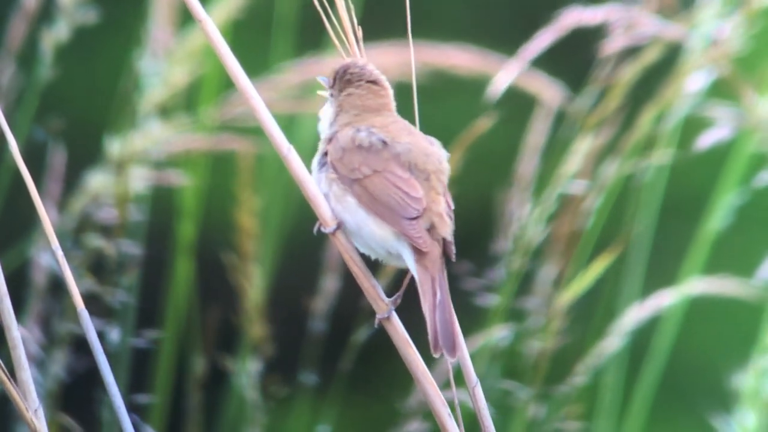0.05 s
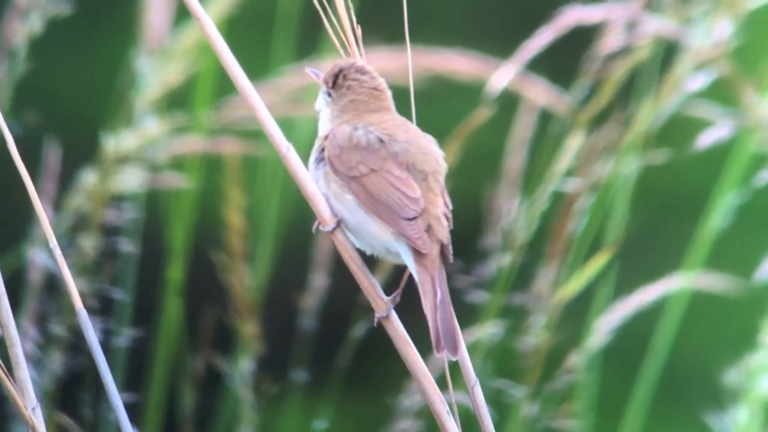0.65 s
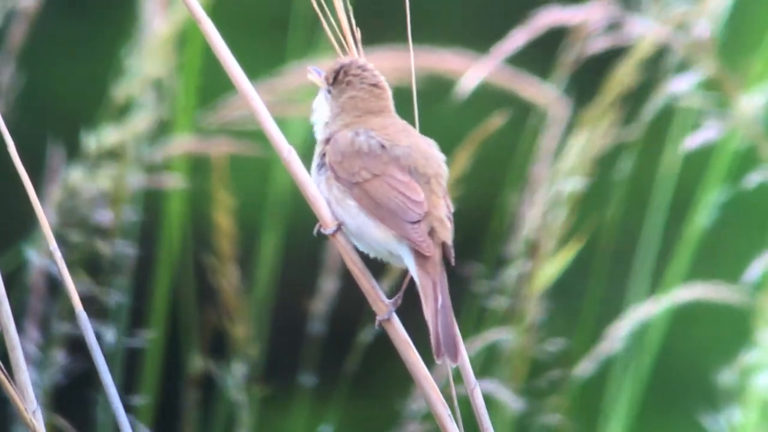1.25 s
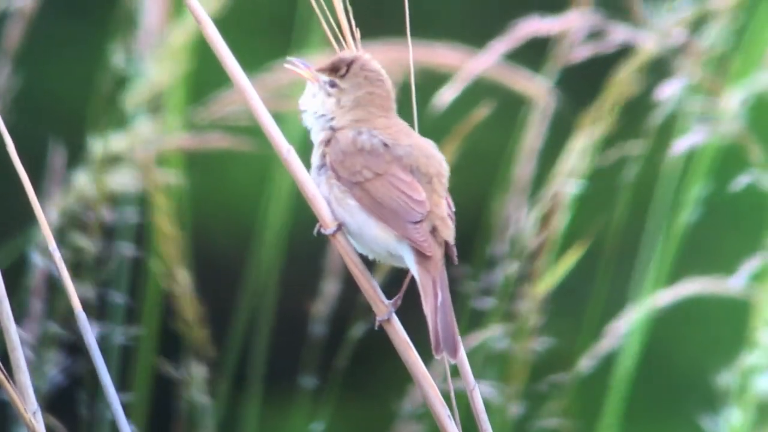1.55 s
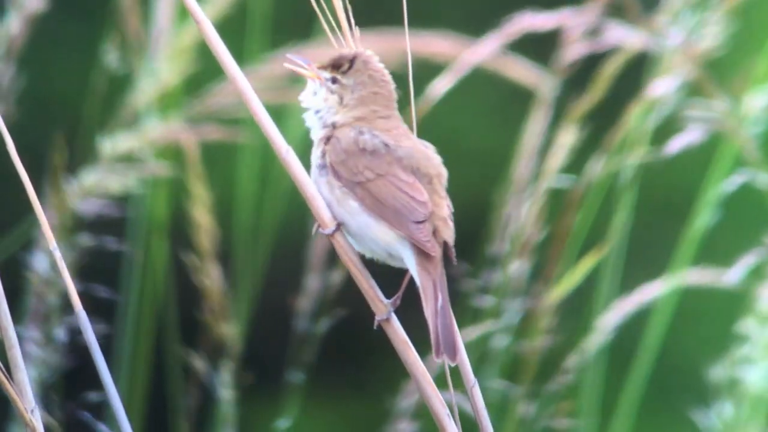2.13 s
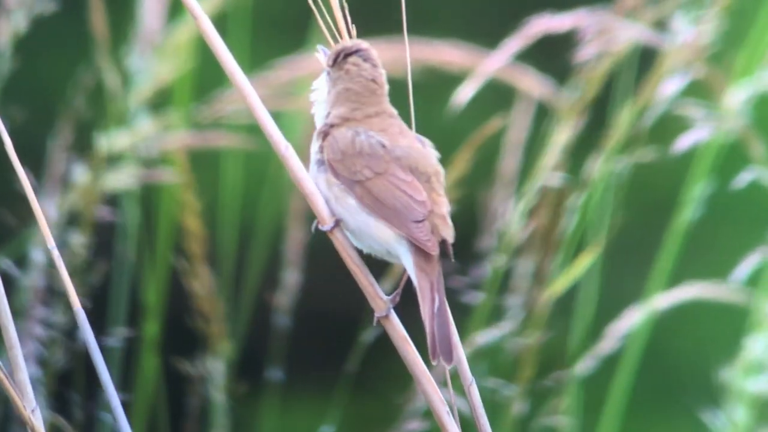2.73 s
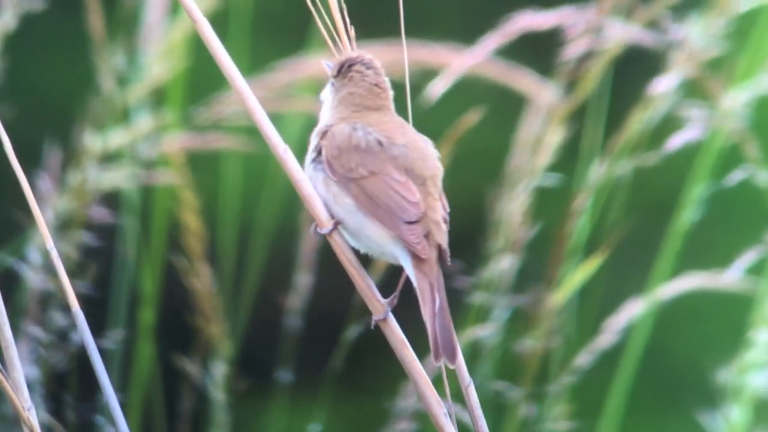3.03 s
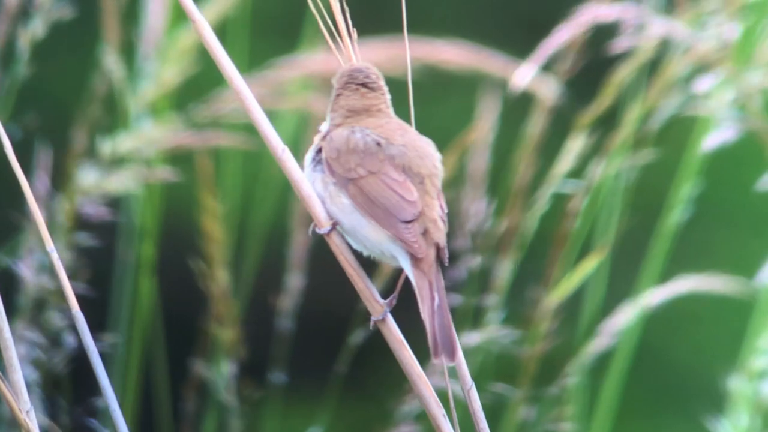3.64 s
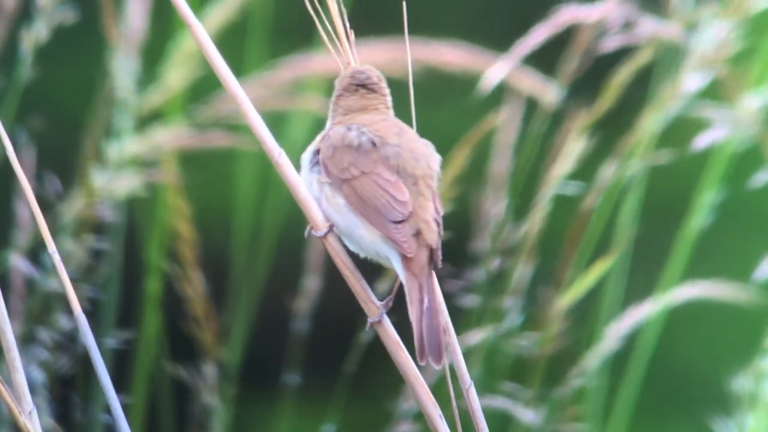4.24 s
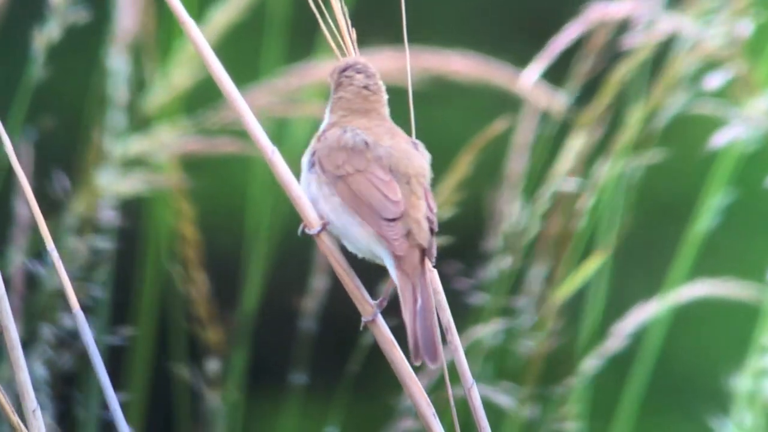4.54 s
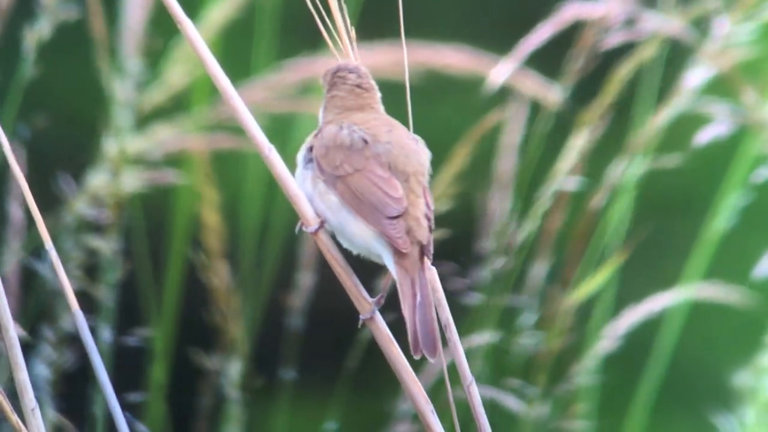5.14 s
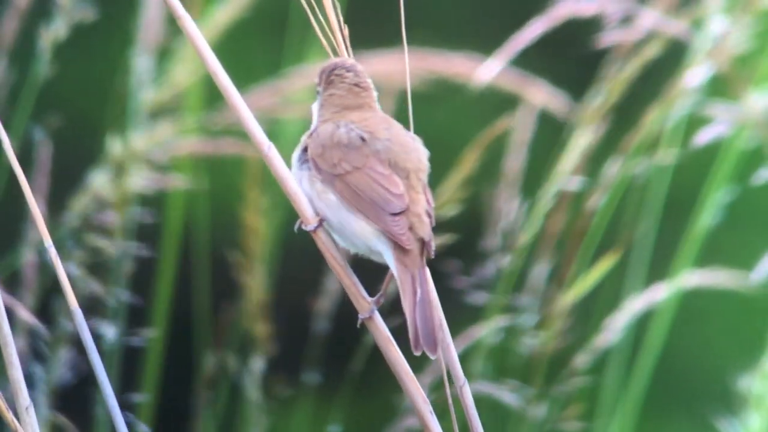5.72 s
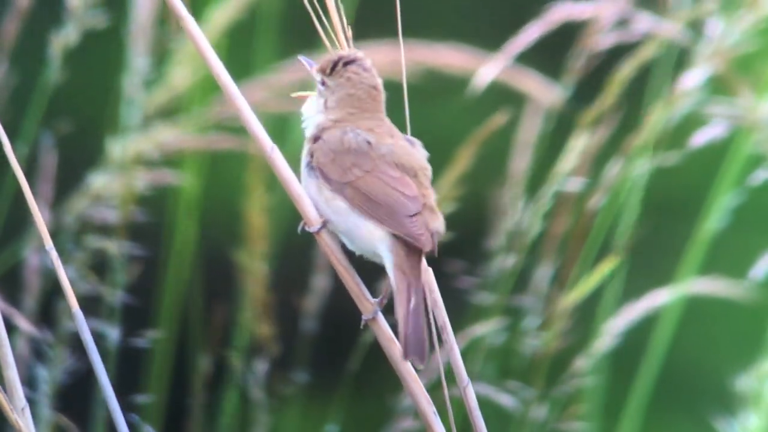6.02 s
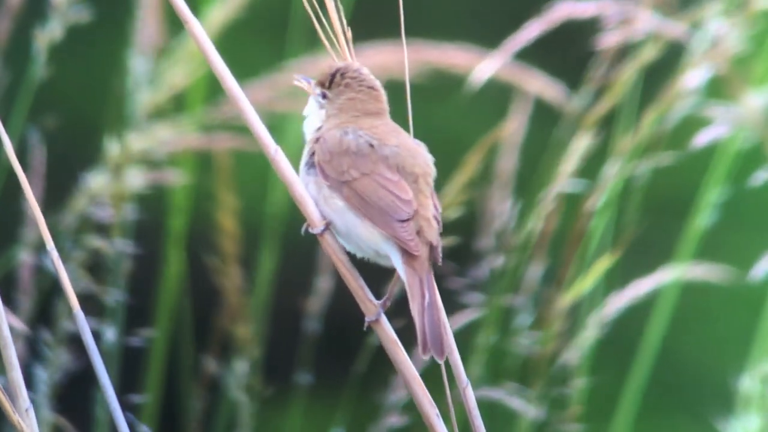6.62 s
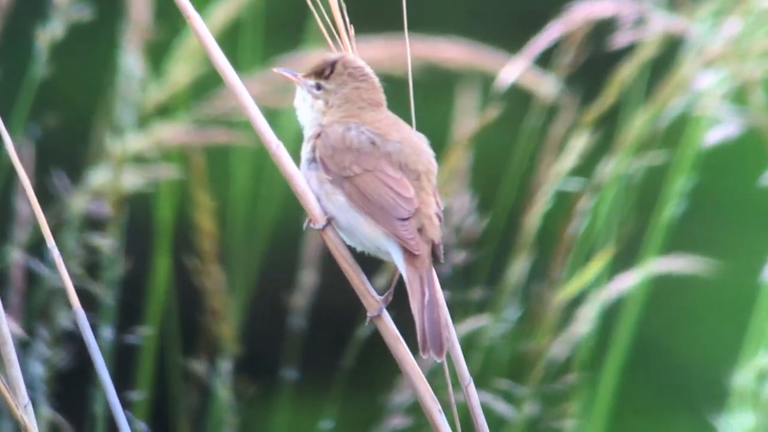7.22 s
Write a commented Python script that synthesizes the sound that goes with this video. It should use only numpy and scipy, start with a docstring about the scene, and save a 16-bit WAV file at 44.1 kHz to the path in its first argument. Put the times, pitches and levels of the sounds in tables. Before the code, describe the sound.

In a reed bed, a warbler sings runs of dry, harsh chacks, switching to quick squeaky chips and raspy sliding notes before returning to chacks. A second bird keeps repeating a clear held whistle that flicks sharply upward, the loudest sound. The notes echo briefly among the stems. Fainter birds call further off, over a steady low rush, soft hiss and distant engine hum.

```python
"""In a reed bed, a warbler sings dry chacks, quick pips and chips, two-voiced notes and raspy slurs.
A second bird repeats a held whistle that flicks upward; fainter birds call further off.
Each note is a tone on a moving pitch; shaking it fast makes it rough. The reeds scatter every note,
over a steady outdoor rush and the hum of a distant engine.
The camera's gain control turns the sound down after each loud note."""
import sys
import numpy as np
from scipy import signal
from scipy.fft import rfft, irfft, next_fast_len
from scipy.io import wavfile
from scipy.ndimage import uniform_filter1d, map_coordinates

SR = 44100
rng = np.random.default_rng(int(sys.argv[2]) if len(sys.argv) > 2 else 0)


def dump(signal):
    """Clip the signal to [-1, 1] and save it as 16-bit WAV at the path in sys.argv[1]."""
    limited = np.clip(np.atleast_2d(signal).T, -1, 1)
    pcm = np.round(limited * 32767).astype(np.int16)
    wavfile.write(sys.argv[1], SR, pcm)


N = 325017


def amp(db):
    """Turn decibels into a gain."""
    return 10 ** (np.asarray(db) / 20)


def along(points, hz):
    """Read between (frequency, value) points, on a log frequency axis."""
    f, v = np.transpose(points)
    return np.interp(np.log(hz + 1), np.log(f + 1), v)


def over_time(points):
    """Join (time, value) points with straight lines."""
    return np.interp(np.arange(N) / SR, *np.transpose(points))


def wobble(rate, size=N):
    """A smooth curve through `rate` random values a second."""
    knots = rng.standard_normal(int(size * rate / SR) + 4)
    return map_coordinates(knots, [np.arange(size) * rate / SR])


def filtered(x, response):
    """Give each frequency in x its own gain."""
    size = next_fast_len(N + SR // 2)
    return irfft(rfft(x, size) * response(np.fft.rfftfreq(size, 1 / SR)), size)[:N]


def noise(spectrum):
    """Noise with the given spectrum, scaled to an average power of 1."""
    x = filtered(rng.standard_normal(N), lambda hz: amp(along(spectrum, hz)))
    return x / np.sqrt(np.mean(x ** 2) + 1e-20)


def span(start, length):
    """A note's sample numbers (i) and its progress from 0 to 1 (u)."""
    i = np.arange(max(int(start * SR), 0), min(int((start + length) * SR), N))
    return i, np.clip((i / SR - start) / length, 0, 1)


def fade(u, rise, fall):
    """Fade in and out; rise and fall are shares of the note's length."""
    opening = np.sin(np.pi / 2 * np.clip(u / rise, 0, 1))
    closing = np.sin(np.pi / 2 * np.clip((1 - u) / fall, 0, 1))
    return opening * closing


def arc(u, first, middle, last):
    """A smooth bend through three pitches."""
    return np.polyval(np.polyfit([0, .5, 1], [first, middle, last], 2), u)


def tone(hz, partials_db=(0,)):
    """A moving pitch; its partials are sine waves at 1, 2, 3... times that pitch."""
    phase = 2 * np.pi * np.cumsum(hz) / SR
    return np.sqrt(2) * sum(amp(db) * np.sin((k + 1) * phase) for k, db in enumerate(partials_db))


# How long the reed bed echoes: f/Hz, time to fade by 60 dB/s
REED_DECAY = [(2000, 0.55), (4500, 0.52), (8000, 0.5)]

def reed_echoes(x, near_db, tail_db, near_decay_s=.12):
    """Nearby stems throw back a quick cloud of echoes; the wider reed bed adds a longer tail."""
    hz, t, spectrum = signal.stft(rng.standard_normal(SR // 2), SR, nperseg=256)
    decay = amp(-60 * t / along(REED_DECAY, hz)[:, None])
    tail = signal.istft(spectrum * decay, SR, nperseg=256)[1]
    t = np.arange(len(tail)) / SR
    stems = rng.standard_normal(len(t)) ** 3 * amp(-60 * t / near_decay_s) * (t > .003)
    response = amp(near_db) * stems / np.linalg.norm(stems) + amp(tail_db) * tail / np.linalg.norm(tail)
    echoes = signal.fftconvolve(x, response)[:N]
    # thin stems reflect high notes better than low ones
    return x + filtered(echoes, lambda hz: amp(along([(2700, -6), (4000, 0)], hz)))


# Tone colour of the open air: f/Hz, relative level/dB
AIR_SPECTRUM = [(20, -30), (32, -11), (50, 1), (68, 2.5), (95, -5.5), (160, -3.5), (250, -9.5), (340, -12),
                (600, -14.5), (1100, -17), (1500, -20), (2200, -53), (3300, -120)]

def outdoor_rush(level_db=-39):
    """A low, nearly steady rush of noise."""
    return amp(level_db + .28 * wobble(7.9)) * noise(AIR_SPECTRUM)


# Tone colour of the reeds: f/Hz, relative level/dB
HISS_SPECTRUM = [(600, -23), (1400, 5), (2600, 0.5), (4500, -2.5), (6000, -8.5), (8000, -13),
                 (12000, -18.5), (15500, -25)]

def reed_hiss(level_db=-46.5):
    """The reeds give a soft, even hiss."""
    return amp(level_db + .4 * wobble(1.64)) * noise(HISS_SPECTRUM)


# The tones in the engine's hum: f/Hz, level/dB
ENGINE_TONES = [(64.3, -44), (75.3, -57), (129.5, -51.5), (150.6, -53), (188.3, -55), (226, -62.5),
                (263.5, -57.5), (338.5, -63.5), (376.5, -60.5), (414, -57.5), (452, -57.5), (465.5, -58)]
# How hard the engine works: t/s, added level/dB
ENGINE_EFFORT = [(0, -0.5), (1.4, -0.5), (3.1, -1), (3.7, -1), (5.5, 2.5), (6.3, -1.5), (7.37, 0.5)]

def engine_hum():
    """A distant engine hums on wavering low tones, louder when it works harder."""
    tones = sum(amp(db + 1.8 * wobble(2.07)) * tone(hz + .586 * wobble(2.984))
                for hz, db in ENGINE_TONES)
    return amp(over_time(ENGINE_EFFORT)) * tones


# Tone colour of the far chorus: f/Hz, relative level/dB
CHORUS_SPECTRUM = [(1000, -50), (1500, -11), (1850, 1.5), (2120, -2), (2450, -18), (3000, -29.5)]
# Its rise and fall: t/s, relative level/dB
CHORUS_LEVELS = [(0.0, -45.5), (1.37, -45), (2.52, -48), (3.86, -43.5), (4.25, -47.5), (5.67, -46.5),
                 (6.28, -45.5), (7.37, -49)]

def far_chorus(gain_db=1.5):
    """Far-off birds blur into one flickering band of noise."""
    return amp(gain_db + over_time(CHORUS_LEVELS) + 2.26 * wobble(14)) * noise(CHORUS_SPECTRUM)


# Distant calls: t/s, length/s, start f/Hz, end f/Hz, level/dB
FAR_CALLS = [(.526, .12, 1915, 2080, -39), (.78, 0.07, 1940, 1850, -40), (6.042, .19, 1975, 1890, -39.5),
             (6.257, 0.063, 1900, 3200, -42.5), (6.411, 0.073, 1906, 2450, -45),
             (6.612, 0.073, 1900, 3350, -43.5), (6.755, 0.1, 2740, 3050, -47),
             (6.84, 0.082, 3030, 2790, -47), (6.741, 0.315, 4330, 4277, -43.5),
             (6.999, 0.244, 4210, 4160, -45.5), (7.186, 0.18, 7170, 7170, -55),
             (7.28, 0.098, 4100, 3680, -52)]

def far_birds(waver_hz=45):
    """Thin, wavering glides carry across the marsh."""
    out, waver, flutter = np.zeros(N), wobble(300), wobble(60)
    for start, length, first, last, db in FAR_CALLS:
        i, u = span(start, length)
        hz = first + (last - first) * u + waver_hz * waver[i]
        out[i] += amp(db + 2 * flutter[i]) * fade(u, .34, .13) * tone(hz)
    return out


def far_twitter(start_s=5.212, period_s=.1283, pairs=8, note_s=.035):
    """A distant bird repeats a pair of quick falling notes at an even pace."""
    out, waver, flutter = np.zeros(N), wobble(300), wobble(160)
    for k in range(pairs):
        for delay_s, db in ((0, -42.5), (.034, -43.5)):
            i, u = span(start_s + k * period_s + delay_s, note_s)
            hz = arc(u, 4926, 3900, 2900) * (1 + .0427 * waver[i])
            out[i] += amp(db + 4 * flutter[i]) * fade(u, .14, .19) * tone(hz)
    return out


# Whistles: end t/s, full voice before the end/s, swell before the end/s, held f/Hz, drift/Hz,
# then level/dB of the held note, the swell, the lead-in, the flick and the tip
WHISTLE_CALLS = [(.322, 0.139, 0.15, 2700, 0, -24, -28.5, -47, -17, -36),
                 (1.849, 0.188, 0.17, 2593, 42, -26, -25.5, -39, -15.5, -35.5),
                 (2.386, 0.2, 0.19, 2574, 108, -35.5, -28, -44, -20, -46),
                 (2.941, 0.21, 0.078, 2835, -62, -31.5, -26, -45, -17, -50),
                 (4.6, 0.19, 0.13, 2625, -30, -30.5, -26, -35, -18, -50),
                 (5.067, 0.1, 0.15, 2738, -2, -20.5, -27, -34.5, -17, -40),
                 (5.583, 0.18, .11, 2699, 0, -28, -28.5, -43, -17, -40),
                 (6.11, 0.15, 0.092, 2608, 26.5, -21, -26.5, -40, -19, -41)]

def whistling_bird(call_s=.235, settle_s=.125, flick_s=.068, top_hz=4297, tip_hz=5200):
    """A whistle starts faintly, sinks onto a held note, then flicks up and stops on a thin tip."""
    out, waver, flutter = np.zeros(N), wobble(90), wobble(45)
    for (end, full_s, swell_s, held_hz, drift_hz,
         held_db, swell_db, lead_db, flick_db, tip_db) in WHISTLE_CALLS:
        start, full, swell, turn = end - call_s, end - full_s, end - swell_s, end - flick_s
        i, u = span(start, call_s + .0041)
        t = i / SR
        settle_hz = 240.6 * np.clip(1 - (t - start) / settle_s, 0, 1) ** 1.7
        climb = uniform_filter1d(np.clip((t - turn) / (flick_s - .006), 0, 1) ** 1.7, size=240)
        base_hz = held_hz + np.interp(t, [turn - .045, turn], [0, drift_hz])
        hz = base_hz + settle_hz + (top_hz - base_hz) * climb
        levels = [(start, lead_db - 4), (full - .005, lead_db), (full, held_db),
                  (swell - .012, held_db), (swell - .005, held_db - 6),  # the voice catches briefly
                  (swell, swell_db), (turn - .004, swell_db),
                  (turn + .012, swell_db - 5),  # and sags as the flick begins
                  (end - .022, flick_db), (end, flick_db - 4)]
        db = np.interp(t, *np.transpose(levels)) + 2.5 * flutter[i]
        voice = tone(hz * (1 + .0067 * waver[i]), partials_db=(0, -46))
        out[i] += amp(db) * fade(u, .048, .051) * voice
        i, u = span(end - .009, .013)
        out[i] += amp(tip_db) * fade(u, .44, .92) * tone(np.full(len(i), tip_hz))
    return out


# Harsh chacks: t/s, top f/Hz, relative level/dB at the edges and at the crest
CHACK_CALLS = [(.566, 2680, -33.5, -37), (.794, 2500, -32.5, -24.5), (1.043, 2900, -26, -32.5),
               (1.294, 2630, -29, -42), (3.179, 2577, -30, -33), (3.419, 2700, -30.5, -23),
               (3.718, 2720, -26.5, -35), (3.973, 2690, -27, -46), (6.311, 2520, -27.5, -27),
               (6.66, 2664, -28, -41), (6.916, 2610, -30, -23), (7.148, 2705, -27, -35)]
# How the throat and open beak colour them: f/Hz, gain/dB
BEAK_FILTER = [(1200, -14), (1900, -1), (2800, -1), (4000, -1), (4900, -4), (5400, -7.5), (6100, -11.5),
               (7500, -16.5), (9000, -42)]

def warbler_chacks(length_s=.036, edge_pitch_ratio=.66, shut_db=2.5):
    """A quick pitch arch, strongest in its second partial: rough at both ends, clearer at the crest."""
    out, shake, flutter = np.zeros(N), wobble(1800), wobble(700)
    for start, top_hz, edge_db, crest_db in CHACK_CALLS:
        i, u = span(start, length_s)
        rasp = np.interp(u, [0, .3, .55, .8], [.11, .033, .033, .13])
        edge_hz = edge_pitch_ratio * top_hz
        hz = arc(u, edge_hz, top_hz, edge_hz) * (1 + rasp * shake[i])
        # the note shuts harder than it opens
        db = np.interp(u, [.2, .55, .82], [edge_db - shut_db / 2, crest_db, edge_db + shut_db / 2])
        lowest_db = np.interp(u, [.6, .9], [-11, -5])  # the lowest partial grows as the pitch falls
        voice = tone(hz, partials_db=(lowest_db, 0, -11, -24))
        out[i] += amp(db + 2 * flutter[i]) * fade(u, .2, .14) * voice
    return filtered(out, lambda hz: amp(along(BEAK_FILTER, hz)))


def raspy_voice(hz, rasp, shake_hz, flutter_db):
    """An unsteady membrane in the bird's voice box roughens pitch and loudness together."""
    hz = hz + rasp * shake_hz
    throat_db = np.interp(hz, [2300, 3900], [-5, 0])  # the throat passes low notes weakly
    return amp(throat_db + rasp * flutter_db) * tone(hz, partials_db=(0, -35))


# The paths of four long slurs: t/s, f/Hz, relative level/dB
HIGH_SLUR = [(2.955, 9329, -50), (2.969, 9060, -56), (2.987, 7720, -39.5), (3.051, 6720, -34),
             (3.079, 5330, -24.5), (3.11, 4920, -31)]
LOW_SLUR = [(3.565, 6958, -46), (3.585, 6723, -44), (3.635, 4695, -24.5), (3.691, 4235, -24),
            (3.721, 4119, -30), (3.745, 4033, -22), (3.757, 4081, -33.5), (3.79, 3930, -25)]
RISING_SLUR = [(4.75, 3730, -33), (4.776, 4319, -27.5), (4.79, 4550, -25), (4.83, 5190, -33),
               (4.89, 6150, -40), (4.92, 6980, -36), (4.95, 7740, -39)]
LATE_SLUR = [(6.42, 6900, -50), (6.446, 6342, -53), (6.494, 6644, -53), (6.52, 5090, -35),
             (6.57, 2640, -36)]

def warbler_slurs(shake_hz, flutter_db, rasp=.536, gain_db=-3.5, fade_s=.0072):
    """The rough voice slides up or down across a wide range."""
    out = np.zeros(N)
    for path in (HIGH_SLUR, LOW_SLUR, RISING_SLUR, LATE_SLUR):
        times, hz, db = np.transpose(path)
        length = times[-1] - times[0]
        i, u = span(times[0], length)
        gain = amp(gain_db + np.interp(i / SR, times, db)) * fade(u, fade_s / length, fade_s / length)
        out[i] += gain * raspy_voice(np.interp(i / SR, times, hz), rasp, shake_hz[i], flutter_db[i])
    return out


# The warbler's notes, by name: length/s, start f/Hz, middle f/Hz, end f/Hz, rasp (0 is pure)
NOTE_SHAPES = {"pip": (.022, 2400, 3080, 3530, 0.27), "chip": (.048, 3400, 4420, 4900, 0.637),
               "squeak": (.044, 4570, 6470, 7060, .7), "zip": (0.016, 2570, 4410, 5300, .8),
               "chord": (0.042, 6500, 6700, 6100, 0.22), "arched chord": (0.0472, 6400, 6760, 6650, 0.18),
               "drop": (0.023, 5100, 3320, 2380, .8), "wheeze": (.2, 3500, 4600, 4840, 1.06),
               "murmur": (.2, 3000, 2820, 2640, .48)}
# Short phrases, by name: t/s within the phrase, note, length ratio, relative level/dB
SONG_PHRASES = {"squeaky": [(0, "pip", 1.7, -29.5), (.063, "squeak", 0.9, -40), (.103, "chip", 1, -26)],
                "two-voiced": [(0, "pip", 0.86, -36.5), (.045, "chord", 1, -45), (.108, "chip", 1, -27)]}
# Runs of one phrase: t/s, phrase, times sung, period/s
PHRASE_RUNS = [(2.553, "squeaky", 2, .198), (4.034, "two-voiced", 3, .199)]
# Notes outside the runs: t/s, note, length ratio, pitch ratio, relative level/dB
SINGLE_NOTES = [(1.973, "pip", 0.83, 1.23, -30.5), (2.038, "arched chord", 1.05, 1.03, -40),
                (2.09, "zip", 1.05, 1.01, -32.5), (2.157, "arched chord", 0.92, .873, -31.5),
                (2.254, "pip", 8.15, 1.2, -28.5), (3.085, "pip", 1, 1.3, -28.5),
                (3.104, "drop", 1.1, .97, -30), (3.176, "wheeze", 1, 1, -36),
                (3.396, "pip", 0.65, .97, -37), (3.415, "chip", 0.76, 1.06, -26.5),
                (4.638, "arched chord", 0.78, 1.1, -51), (4.667, "drop", 1.25, 1.09, -35),
                (3.764, "murmur", 1, 1, -36), (6.691, "wheeze", 0.61, 0.93, -42.5)]

def warbler_notes(shake_hz, flutter_db, second_ratio=.836, second_db=.5):
    """The voice bends through short notes, sung singly or in quick repeated phrases."""
    out = np.zeros(N)
    repeated = [(start + k * period + offset, name, stretch, 1, db)
                for start, phrase, repeats, period in PHRASE_RUNS
                for k in range(repeats)
                for offset, name, stretch, db in SONG_PHRASES[phrase]]
    for start, name, stretch, pitch_ratio, db in SINGLE_NOTES + repeated:
        length, first, middle, last, rasp = NOTE_SHAPES[name]
        i, u = span(start, length * stretch)
        hz = pitch_ratio * arc(u, first, middle, last)
        voice = raspy_voice(hz, rasp, shake_hz[i], flutter_db[i])
        if "chord" in name:  # the other side of the voice box adds a lower note
            voice += amp(second_db) * raspy_voice(second_ratio * hz, rasp, shake_hz[i], flutter_db[i])
        out[i] += amp(db) * fade(u, .38, .3) * voice
    return out


def scene():
    """The birds echo among the reeds, over the steady background."""
    birds = reed_echoes(whistling_bird(), near_db=-3, tail_db=-5)
    shake_hz = 340 * wobble(900) + 200 * wobble(2200)  # the warbler's unsteady voice
    flutter_db = 3 * wobble(350)
    song = warbler_notes(shake_hz, flutter_db) + warbler_slurs(shake_hz, flutter_db)
    birds += reed_echoes(song, near_db=.5, tail_db=-2.5)
    birds += reed_echoes(warbler_chacks(), near_db=-1.5, tail_db=-3)
    birds += reed_echoes(far_birds(), near_db=-5, tail_db=-2.5)
    birds += reed_echoes(far_twitter(), near_db=-6, tail_db=2)
    background = outdoor_rush() + engine_hum() + far_chorus() + reed_hiss()
    return (background + birds)[None]


def record(dry):
    """The camera turns its gain down on loud notes, recovers slowly and cuts the highest treble."""
    threshold_db, share_removed, recover_db_per_s, top_hz = -24.5, .37, 6.5, 15750
    level_db = 10 * np.log10(np.abs(uniform_filter1d(dry[0] ** 2, size=220)) + 1e-12)
    wanted_cut_db = share_removed * np.maximum(level_db - threshold_db, 0)
    recovery_db = recover_db_per_s * np.arange(N) / SR
    cut_db = np.maximum.accumulate(wanted_cut_db + recovery_db) - recovery_db
    return filtered(dry[0] * amp(-cut_db), lambda hz: hz < top_hz)[None]


dry = scene()
out = record(dry)
dump(out)
```